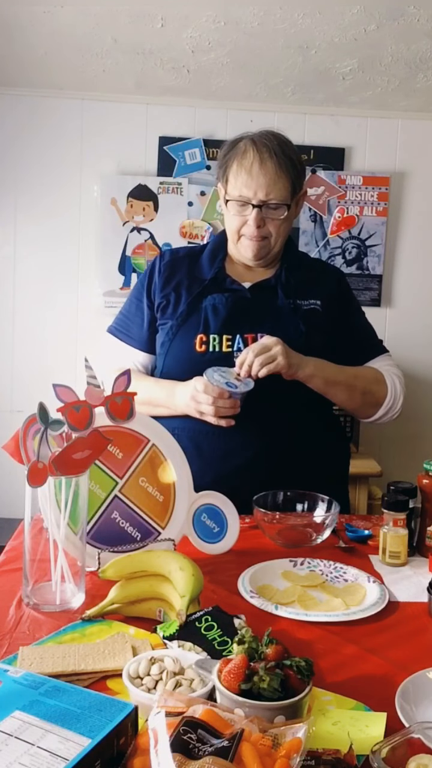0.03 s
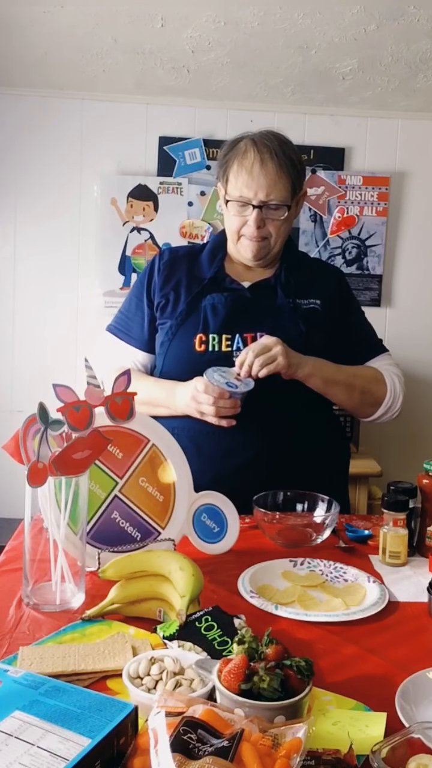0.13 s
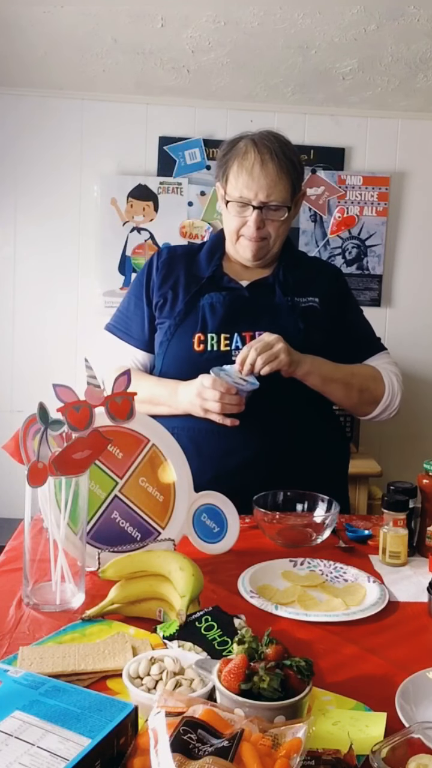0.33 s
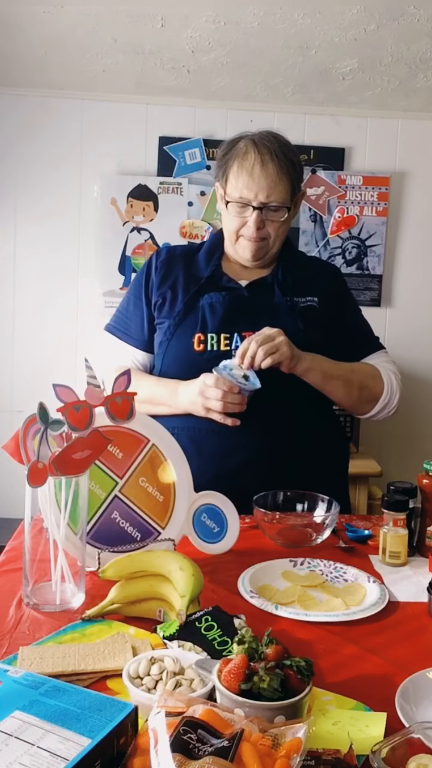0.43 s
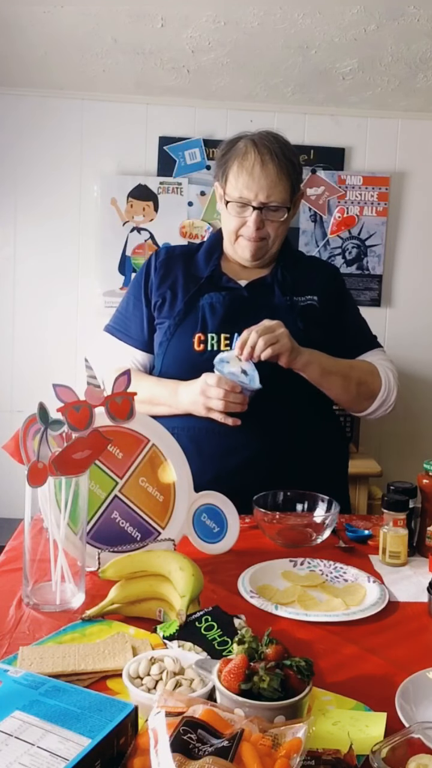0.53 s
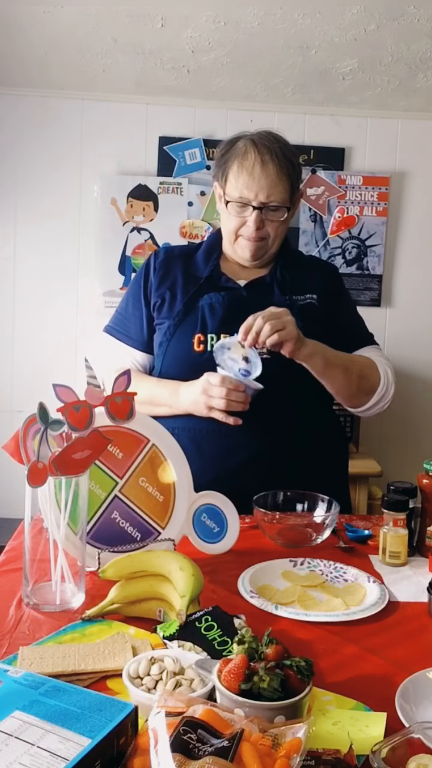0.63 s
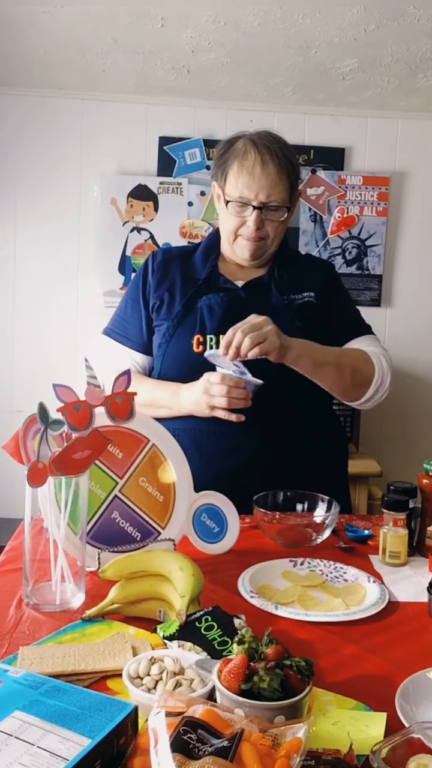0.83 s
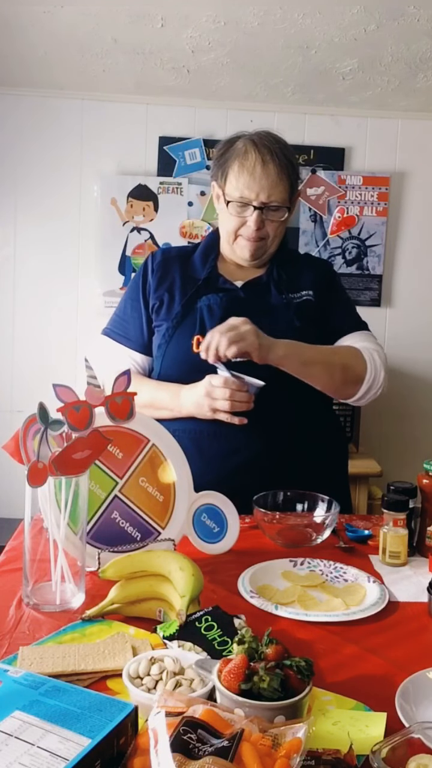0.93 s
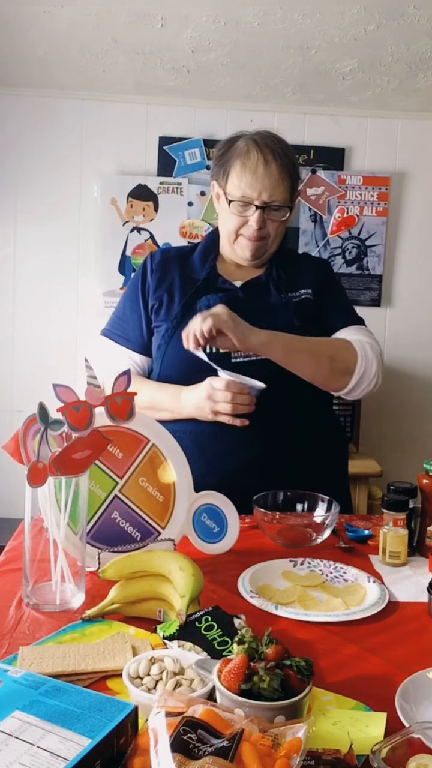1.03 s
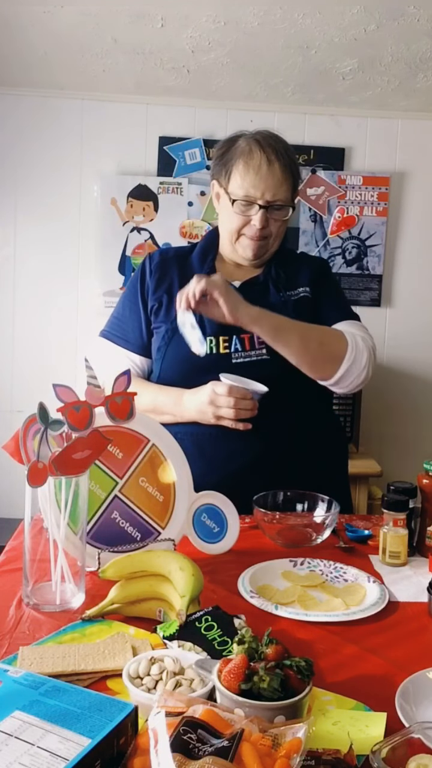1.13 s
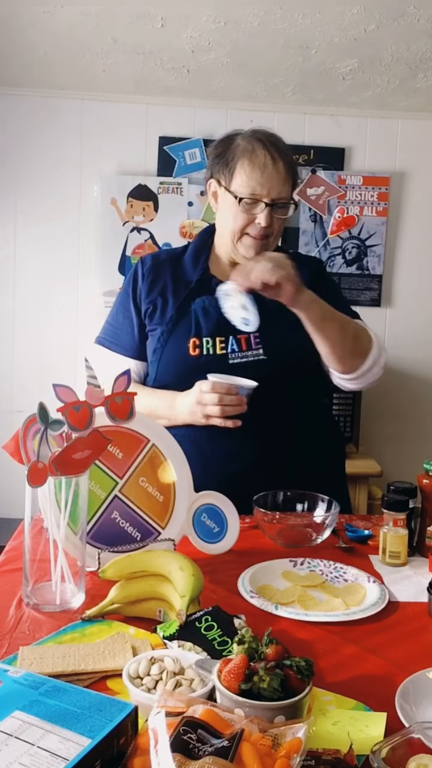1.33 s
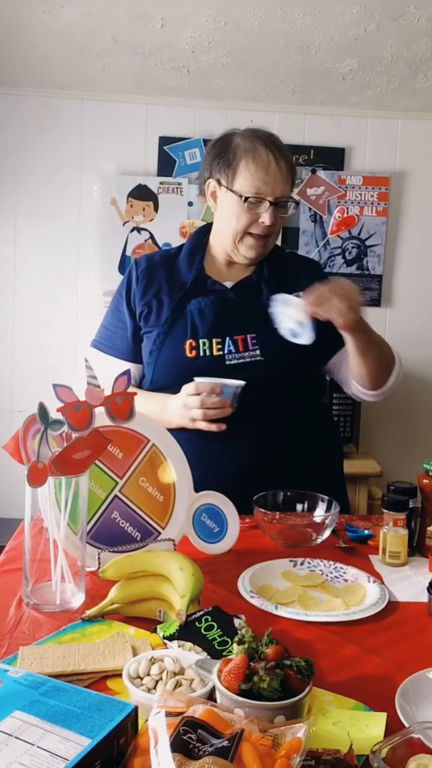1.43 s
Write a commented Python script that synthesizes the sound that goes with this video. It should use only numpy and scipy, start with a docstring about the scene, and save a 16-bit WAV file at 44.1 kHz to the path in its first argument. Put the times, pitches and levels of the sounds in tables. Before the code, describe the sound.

A foil lid is peeled off a plastic yogurt cup, heard close in a small room with faint appliance hum. Slight rustle at first, a plastic pop at 0.22 seconds, then the seal cracks sharply around 0.28-0.34. From 0.45 to 0.75 it rips open, crackling, ringing and hollow, with a pop at 0.62. After near quiet, faint wet sliding, foil rustle and soft finger bumps come at 0.94-1.16.

```python
"""A foil lid is peeled off a small plastic yogurt cup in a living room; an appliance hums throughout.
Random clicks rustle the foil and slide on the wet rim. The cup wall pops under the thumb: ringing modes and noise.
The seal cracks open, then unzips round the rim: tiny slips drive foil crackle, cup modes and a sinking flap.
Last, the lid drags on the wet rim, fingers bump the cup in decaying sines and the last corner snaps free in
noise bursts."""
import sys
import numpy as np
from scipy import signal
from scipy.fft import rfft, irfft
from scipy.io import wavfile

SR = 44100
rng = np.random.default_rng(int(sys.argv[2]) if len(sys.argv) > 2 else 0)


def int16_out(signal):
    """Quantize to a 16-bit WAV file."""
    q = np.round(np.clip(np.atleast_2d(signal).T, -1, 1) * 32767)
    wavfile.write(sys.argv[1], SR, q.astype(np.int16))


N = 66150
TIME_S = np.arange(N) / SR

# Room noise colour. Each row: frequency in Hz, relative density in dB per Hz.
ROOM_COLOUR = [(25, -7), (60, 4), (160, 2), (330, -0.5), (550, -6.5), (1200, -13.5), (2500, -19.5),
               (6000, -24), (12000, -29), (16000, -39)]
ROOM_NOISE_DB = -63
# Appliance hum and whine. Each row: frequency in Hz, rms level in dB.
HUM_LINES = [(144.5, -71.5), (193.5, -73.5), (288.8, -67.5), (385.2, -67), (1249, -81), (1306.5, -70.5)]

# Rustle of the loose foil. Each row: time in seconds, level in dB.
RUSTLE_LEVELS = [(0, -59.5), (.04, -73.5), (.11, -98), (.92, -72), (.945, -77), (1.052, -77), (1.066, -56),
                 (1.09, -66), (1.135, -56), (1.165, -67), (1.2, -68), (1.29, -77)]
# Snaps of the foil. Each row: start in seconds, strength in dB.
FOIL_SNAPS = [(0.2741, -31.5), (.2795, -33), (0.287, -22.5), (0.444, -37), (0.462, -54), (0.6226, -28.5),
              (1.141, -31), (1.147, -32), (1.152, -39)]
# Loose foil colour. Each row: frequency in Hz, relative density in dB per Hz.
FOIL_COLOUR = [(150, -30), (700, -14.5), (1300, -11.5), (2200, -0.5), (2650, -11), (3300, 2.5),
               (4800, -3.5), (7500, -10.5), (11000, -21), (16000, -19)]
CRINKLES_PER_S, CRINKLE_SPREAD_DB, FOIL_T60_S = 2200, -1, 0.033

# Thumb and lid sliding on the wet rim. Each row: time in seconds, hiss level in dB, squelch level in dB.
SLIDE_LEVELS = [(0, -94, -61), (.05, -101, -62.5), (.14, -97, -78), (.925, -100, -87), (.945, -63, -81),
                (.985, -72.5, -80), (1.02, -67.5, -70), (1.037, -80, -59), (1.057, -74, -88),
                (1.066, -57.5, -60), (1.095, -63.5, -60), (1.12, -62, -64), (1.145, -49, -61),
                (1.16, -89, -90)]
# Sliding hiss colour. Each row: frequency in Hz, relative density in dB per Hz.
HISS_COLOUR = [(2000, -16), (5000, 0.5), (8500, 2), (15000, -7)]
# Wet rim modes. Each row: frequency in Hz, relative level in dB, T60 in seconds.
SQUELCH_MODES = [(770, -0.5, 0.02), (970, 3.5, 0.01), (1450, -0.5, 0.02), (1690, -1.5, .03),
                 (2060, -9, 0.024), (2780, -3, 0.019)]

# Pops of the cup wall. Each row: start in seconds, strength in dB, treble cut in Hz, pitch ratio.
WALL_POPS = [(0.0922, -54.5, 1300, .97), (0.2208, -17, 3000, 1), (0.2236, -23.5, 3500, 0.96),
             (0.279, -27, 6000, 0.81), (0.318, -17.5, 4000, 0.85), (0.323, -12.5, 4000, 0.94),
             (0.6227, -14, 3500, 1)]
# Cup wall modes. Each row: frequency in Hz at pitch ratio 1, level in dB, T60 in seconds.
WALL_MODES = [(785, -23, .06), (1205, -17.5, 0.024), (1281, -6, .035), (1464, -8.5, 0.081),
              (1580, -14, .03), (1996, -20, .015), (3286, -8.5, 0.03), (4370, -16, 0.0087)]
POP_NOISE_DB, POP_NOISE_T60_S = 5.5, 0.03

# The seal cracking open. Each row: time in seconds, foil crackle level in dB, cup ring level in dB.
CRACK_LEVELS = [(.268, -46.5, -74.5), (.278, -42.5, -46), (.281, -29.5, -30), (.294, -23, -27.5),
                (.308, -27, -31.5), (.326, -30.5, -29.5), (.342, -34.5, -51), (.385, -54, -43.5),
                (.44, -62, -54)]
# Tearing seal colour. Each row: frequency in Hz, relative density in dB per Hz.
SEAL_COLOUR = [(100, -27), (300, -7.5), (800, -0.5), (1700, 3.5), (2400, -1), (3200, 4.5), (5000, 0),
               (7000, -3.5), (10000, -8), (13000, -10.5), (16000, -40.5)]
# Modes of the cup under a taut lid. Each row: frequency in Hz, relative level in dB, T60 in seconds.
SEALED_MODES = [(756, 1.5, .06), (1090, -7, .04), (1255, 5.5, 0.049), (1398, 4.5, .035), (1726, -8, .03),
                (2848, 6.5, 0.028), (2940, -6, .04), (5080, -4.5, .03), (5540, -9, .03)]
SLIPS_PER_S, SLIP_SPREAD_DB = 3200, 2.5
SURGES_PER_S, SURGE_DB = 170, 2.5

# The seal unzipping. Each row: time in seconds, foil crackle level in dB, cup ring level in dB,
# rim rasp level in dB, level in dB of the hollow of the opening cup.
PEEL_LEVELS = [(.442, -52, -40, -70, -74), (.445, -38, -34.5, -39, -69), (.475, -31.5, -29.5, -43, -45),
               (.495, -35.5, -31, -23, -45), (.518, -28, -52, -34, -30), (.54, -38, -31, -35, -34.5),
               (.565, -41, -27.5, -29.5, -39.5), (.617, -41, -34.5, -33, -43.5),
               (.632, -29.5, -30, -37, -39), (.655, -35.5, -43.5, -49, -54.5), (.68, -26.5, -42, -44, -55),
               (.705, -34.5, -66, -41.5, -48), (.73, -33.5, -71, -58, -50), (.755, -64, -85, -87, -68)]
# Modes of the cup as the lid lifts. Each row: frequency in Hz, relative level in dB, T60 in seconds.
OPEN_MODES = [(773, 2, 0.05), (991.3, -1.5, 0.086), (1156, 6, 0.043), (1286, 3, 0.079), (1441, 4, 0.052),
              (2080, -25, 0.042), (3036, -1, 0.06), (3300, -7, 0.0092)]
# Modes of the rim under the peeling edge. Each row: frequency in Hz, relative level in dB, T60 in seconds.
RIM_MODES = [(1540, -10, 0.086), (1644, 17, 0.059), (1690, -4, .06)]
# Modes of the air in the open cup. Each row: frequency in Hz, relative level in dB, T60 in seconds.
HOLLOW_MODES = [(350, -21, 0.041), (448, -8.5, 0.14), (509, 0, 0.03), (620, -8, 0.021), (710, 5.5, 0.013)]
PEEL_LOW_CUT_HZ = 320

# The freed flap, lower as it grows. Each row: time in seconds, level in dB, pitch in Hz.
FLAP_TRACK = [(0.491, -43, 454), (0.512, -39, 364), (.55, -57, 357), (.62, -57, 334), (0.678, -67, 200),
              (0.713, -42.5, 148), (.735, -70, 135)]
FLAP_WIDTH_HZ = 40

# Fingers bumping the cup. Each row: start in seconds, strength in dB, pitch in Hz.
FINGER_BUMPS = [(1.039, -47.5, 310), (1.111, -49, 318), (1.148, -47, 148)]
BUMP_T60_S = 0.065

# Echoes from table and body. Each row: delay in seconds, level in dB re direct sound.
ECHOES = [(.0039, -13), (.0054, -15.5), (0.0101, -16), (0.0127, -14)]
# Reverberation time. Each row: frequency in Hz, T60 in seconds.
ROOM_T60 = [(200, 0.27), (1000, 0.27), (4000, 0.26), (9000, 0.24), (16000, 0.22)]
REVERB_DB, REVERB_ONSET_S = -8, 0.018  # level re direct sound
CUTOFF_HZ = 15750


def from_db(db):
    """Decibels to gain."""
    return 10 ** (np.asarray(db) / 20)


def decay(t60_s):
    """Exponential decay by 60 dB in t60_s."""
    return from_db(-60 * TIME_S / t60_s)


def unit_energy(x):
    """Scale so that the squares sum to one."""
    return x / np.sqrt(np.sum(x ** 2) + 1e-20)


def level_curve(times_s, levels_db):
    """Gain interpolated in dB, silent outside the table."""
    return from_db(np.interp(TIME_S, times_s, levels_db, left=-150, right=-150))


def gains(rows):
    """One gain curve per dB column."""
    times_s, *columns_db = np.transpose(rows)
    return [level_curve(times_s, column_db) for column_db in columns_db]


def at_hz(points, hz):
    """Read a table on a log-frequency axis."""
    table_hz, value = np.transpose(points)
    return np.interp(np.log(hz + 1), np.log(table_hz), value)


def through(x, response):
    """Pass a sound through an impulse response."""
    return signal.fftconvolve(x, response)[:N]


def low_cut(x, hz):
    """A small body radiates little bass."""
    return signal.sosfilt(signal.butter(4, hz, "high", fs=SR, output="sos"), x)


def tick(colour, size=4096):
    """A causal, minimum-phase click of the given spectrum."""
    bins_hz = np.linspace(0, SR / 2, size // 2 + 1)
    cepstrum = irfft(np.log(from_db(at_hz(colour, bins_hz))))
    # Folding the cepstrum makes the phase minimum.
    cepstrum[1:size // 2] *= 2
    cepstrum[size // 2 + 1:] = 0
    return unit_energy(irfft(np.exp(rfft(cepstrum))))


def ringing(modes):
    """Decaying tones of a struck body."""
    return sum(from_db(db) * decay(t60_s) * np.cos(2 * np.pi * hz * TIME_S) for hz, db, t60_s in modes)


def scatter(t60_s):
    """Dense, decaying noise."""
    return unit_energy(rng.standard_normal(N) * decay(t60_s))


def impulse(start_s, db):
    """One click at a given time."""
    return (np.arange(N) == int(start_s * SR)) * from_db(db)


def slips(per_s, spread_db):
    """Random tiny releases of uneven size and either sign; rms 1."""
    sizes = from_db(spread_db * np.minimum(rng.exponential(1, N), 3))
    signed = sizes * rng.choice([-1, 1], N)
    happens = rng.random(N) < per_s / SR
    return unit_energy(signed * happens) * np.sqrt(N)


def tearing():
    """Tiny slips that come in surges as the seal sticks and lets go."""
    surge = np.interp(TIME_S * SURGES_PER_S, np.arange(1000), rng.standard_normal(1000))
    return slips(SLIPS_PER_S, SLIP_SPREAD_DB) * from_db(SURGE_DB * np.tanh(surge))


def background():
    """Low room noise and the steady lines of an appliance."""
    out = through(rng.standard_normal(N), tick(ROOM_COLOUR)) * from_db(ROOM_NOISE_DB)
    for hz, db in HUM_LINES:
        cycles = hz * TIME_S + rng.random()
        out = out + np.sqrt(2) * from_db(db) * np.sin(2 * np.pi * cycles)
    return out


def loose_foil():
    """Fine crinkling clicks, plus noise that flares up and dies at each snap."""
    rustle, = gains(RUSTLE_LEVELS)
    flares = 0
    for start_s, db in FOIL_SNAPS:
        age_s = np.abs(TIME_S - start_s)
        flares = flares + (TIME_S >= start_s) * from_db(db - 60 * age_s / FOIL_T60_S)
    crinkles = rustle * slips(CRINKLES_PER_S, CRINKLE_SPREAD_DB)
    return through(crinkles + flares * rng.standard_normal(N), tick(FOIL_COLOUR))


def slide():
    """Slips on the wet rim, coloured as hiss and ringing as squelch."""
    hiss_gain, squelch_gain = gains(SLIDE_LEVELS)
    hiss = through(hiss_gain * slips(1000, 1.9), tick(HISS_COLOUR))
    squelch = through(squelch_gain * slips(350, 1.9), unit_energy(ringing(SQUELCH_MODES)))
    return hiss + squelch


def pops():
    """The cup wall buckles with a ring and a puff of noise, each pop with its own treble cut."""
    out = 0
    for start_s, db, cut_hz, pitch_ratio in WALL_POPS:
        treble_cut = signal.butter(3, min(cut_hz, SR / 3), fs=SR, output="sos")
        push = signal.sosfilt(treble_cut, impulse(start_s, db) + 1e-18)
        ring = ringing(np.array(WALL_MODES) * [pitch_ratio, 1, 1])
        puff = scatter(POP_NOISE_T60_S) * from_db(POP_NOISE_DB)
        out = out + through(push, ring + puff)
    return low_cut(out, 150)


def crack():
    """The first stretch of seal gives way and rings the closed cup."""
    foil_gain, cup_gain = gains(CRACK_LEVELS)
    pull = tearing()
    crackle = through(pull * foil_gain, tick(SEAL_COLOUR))
    cup = through(pull * cup_gain, low_cut(unit_energy(ringing(SEALED_MODES)), 240))
    return crackle + cup


def peel():
    """The seal unzips round the rim; slips ring cup, rim and the hollow of the opening cup."""
    foil_gain, cup_gain, rim_gain, hollow_gain = gains(PEEL_LEVELS)
    pull = tearing()
    cup = through(pull * cup_gain, unit_energy(ringing(OPEN_MODES)))
    rim = through(pull * rim_gain, unit_energy(ringing(RIM_MODES)))
    hollow = through(pull * hollow_gain, unit_energy(ringing(HOLLOW_MODES)))
    crackle = through(tearing() * foil_gain, tick(SEAL_COLOUR))
    return crackle + low_cut(cup + rim + hollow, PEEL_LOW_CUT_HZ)


def flap():
    """Slips drive one resonance of the freed foil, which sinks in pitch."""
    times_s, levels_db, pitches_hz = np.transpose(FLAP_TRACK)
    pitch_hz = np.interp(TIME_S, times_s, pitches_hz)
    turn = np.exp(2j * np.pi * np.cumsum(pitch_hz) / SR)
    # Shift the pitch to 0 Hz, smooth with a one-pole, shift back: a gliding resonator.
    pole = np.exp(-np.pi * FLAP_WIDTH_HZ / SR)
    swing = np.real(turn * signal.lfilter([1], [1, -pole], tearing() / turn))
    return unit_energy(swing) * np.sqrt(N) * level_curve(times_s, levels_db)


def bumps():
    """Soft low knocks of the fingers: decaying sines."""
    out = 0
    for start_s, db, hz in FINGER_BUMPS:
        age_s = np.maximum(TIME_S - start_s, 0)
        out = out + from_db(db - 60 * age_s / BUMP_T60_S) * np.sin(2 * np.pi * hz * age_s)
    return out


def room(x):
    """Direct sound, near echoes and a diffuse tail that dies band by band."""
    noise = rfft(rng.standard_normal(N))
    hz = np.arange(N // 2 + 1) * SR / N
    edges_hz = np.geomspace(60, 18000, 21)
    tail = 0
    for low_hz, high_hz in zip(edges_hz, edges_hz[1:]):
        band = irfft(noise * (hz >= low_hz) * (hz < high_hz), N)
        tail = tail + band * decay(at_hz(ROOM_T60, np.sqrt(low_hz * high_hz)))
    onset = 1 - np.exp(-TIME_S / REVERB_ONSET_S)
    tail = from_db(REVERB_DB) * unit_energy(tail * onset)
    echoes = sum(impulse(delay_s, db) for delay_s, db in ECHOES)
    return through(x, unit_energy(impulse(0, 0) + echoes + tail))


def scene():
    """Cup and lid in the room, one channel."""
    cup_and_lid = crack() + peel() + flap() + pops() + loose_foil() + slide() + bumps()
    return (room(cup_and_lid) + background())[None]


def record(dry):
    """A steep elliptic low-pass cuts the top."""
    return signal.sosfilt(signal.ellip(12, .1, 80, CUTOFF_HZ, fs=SR, output="sos"), dry)


dry = scene()
out = record(dry)
int16_out(out)
```